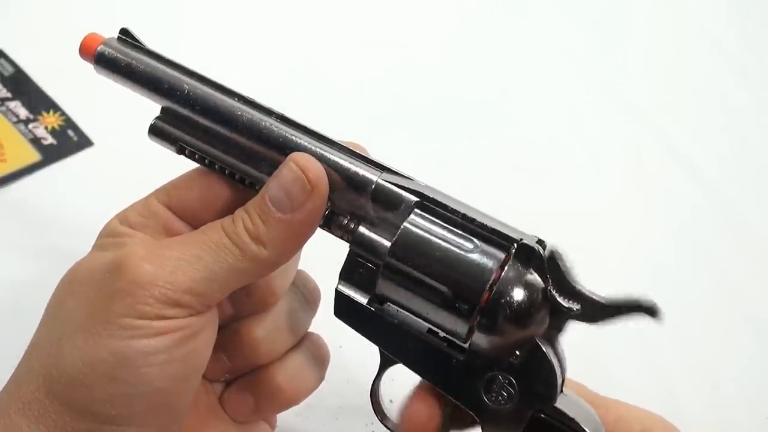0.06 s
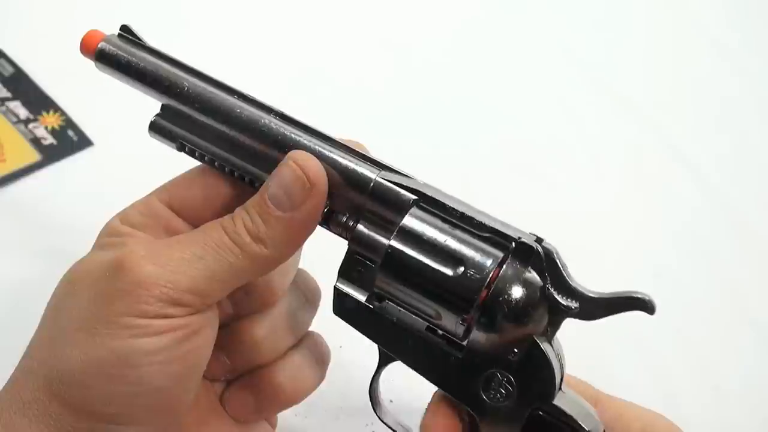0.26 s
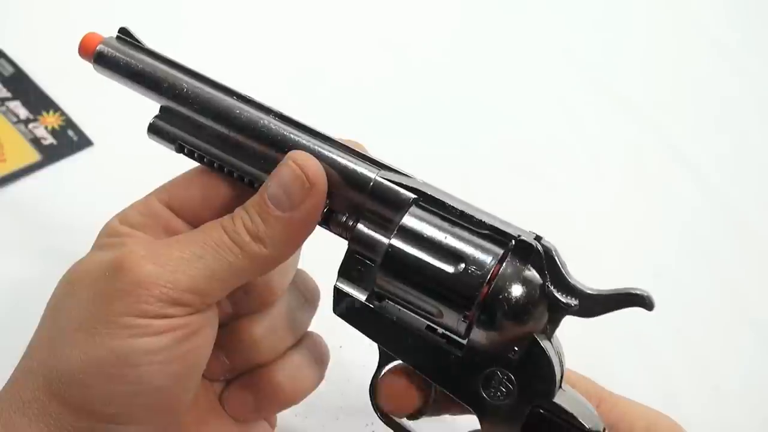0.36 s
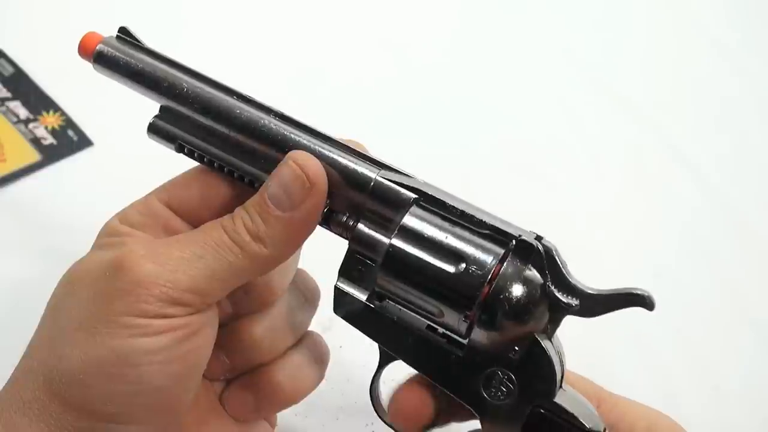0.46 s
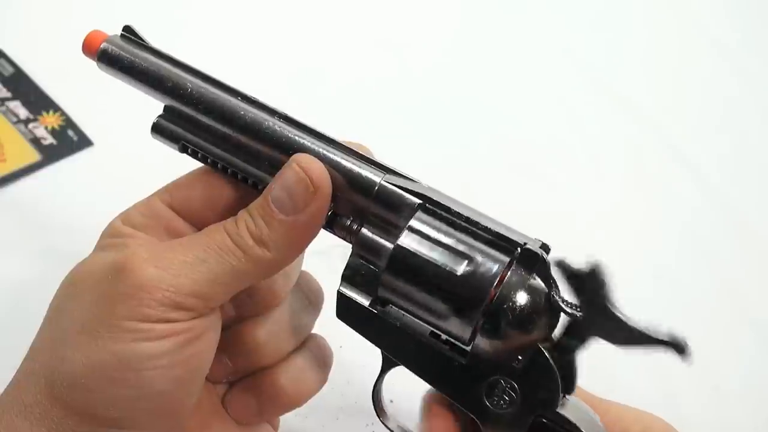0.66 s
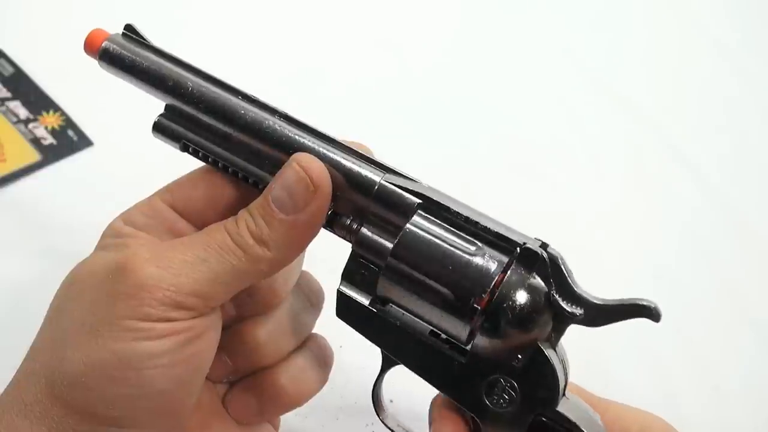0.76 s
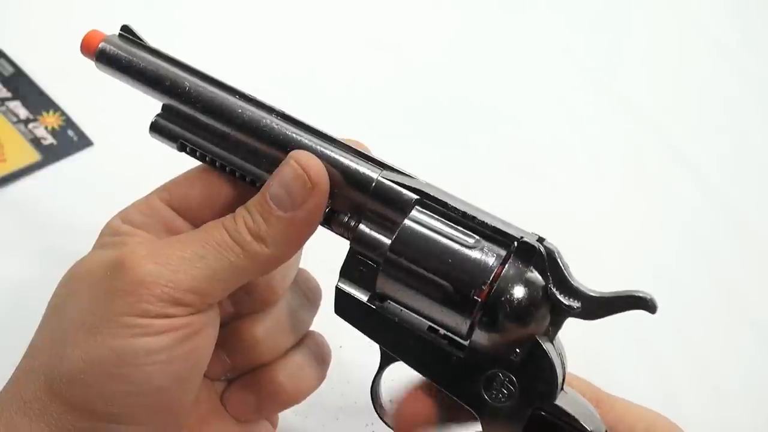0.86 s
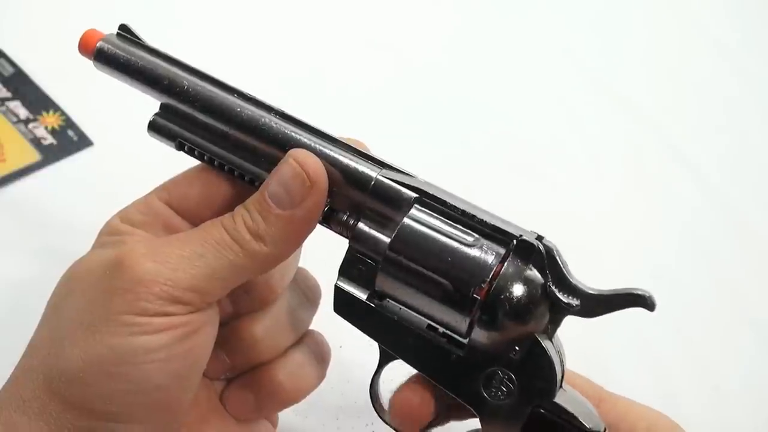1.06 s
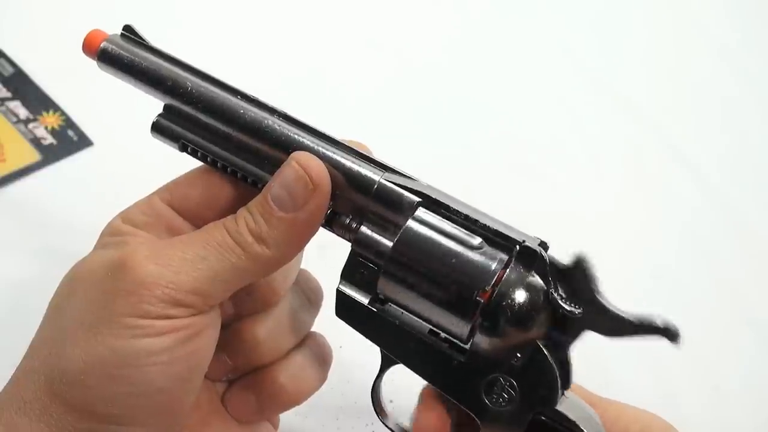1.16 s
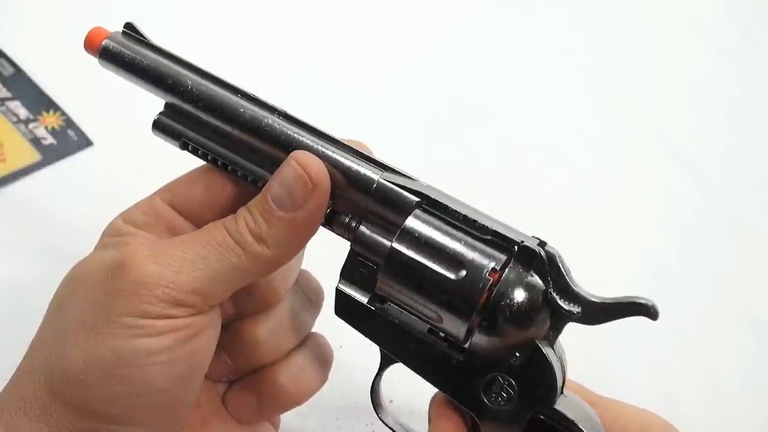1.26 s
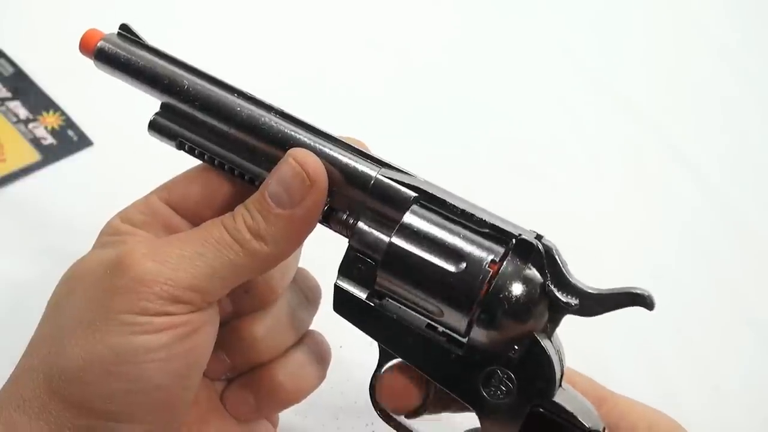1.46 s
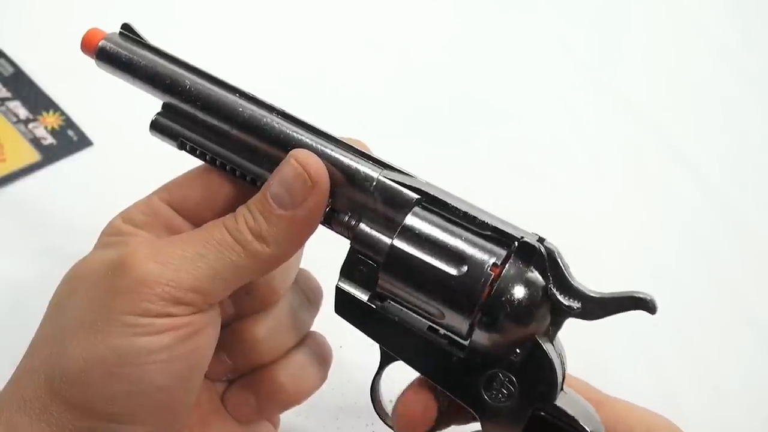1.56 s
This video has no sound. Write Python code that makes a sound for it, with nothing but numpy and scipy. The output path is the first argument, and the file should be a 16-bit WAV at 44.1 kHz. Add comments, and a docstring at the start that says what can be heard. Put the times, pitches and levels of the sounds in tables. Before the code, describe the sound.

Three sharp cracks from a toy cap revolver come at an even pace, close up indoors. Each dies away quickly and is followed by a bright trigger click, with light metal ticking as the cylinder turns.

```python
"""Small room: a toy metal revolver fires three caps close by, over faint air noise.
Each pull scrapes and ticks the cylinder round, the hammer swings, the cap cracks
and a short, dense, squashed-sounding blare follows, dying away with the room.
The trigger snaps back with a bright click; the metal frame rings on faintly."""
import sys
import numpy as np
from scipy import signal
from scipy.fft import rfft, irfft
from scipy.io import wavfile

SR = 44100
rng = np.random.default_rng(int(sys.argv[2]) if len(sys.argv) > 2 else 0)


def generate_wav(sig):
    """Save sig (samples, or channels by samples) to the path in sys.argv[1] as 16-bit PCM at SR."""
    pcm = np.round(np.clip(np.atleast_2d(sig).T, -1, 1) * 32767).astype(np.int16)
    wavfile.write(sys.argv[1], SR, pcm)


N = 70560
T = np.arange(N) / SR
FREQS_HZ = np.maximum(np.fft.rfftfreq(N, 1 / SR), 1)

# cylinder scrapes: t/s, length/s, level/dB
SCRAPES = [(0.049, 0.042, -59), (0.678, 0.049, -57), (1.101, 0.054, -67.5)]
# pawl and cylinder ticks: t/s, level/dB
RATCHET_TICKS = [(0.0650, -48.5), (0.0790, -46.5), (0.139, -48), (0.1465, -44.5), (0.1550, -51),
                 (0.1650, -53.5), (0.1740, -53.5), (0.3530, -43), (0.542, -51.5), (0.697, -44.5),
                 (0.705, -50.5), (0.7140, -45), (0.7314, -44.5), (0.908, -47.5), (1.1404, -45),
                 (1.1978, -49), (1.2100, -45), (1.2170, -53.5), (1.2310, -55), (1.2450, -42.5),
                 (1.407, -49), (1.5560, -56.5), (1.5880, -49.5)]
# hammer swings: t/s, length/s, level/dB
HAMMER_SWINGS = [(0.1964, 0.02, -30.5), (0.738, 0.0057, -41), (1.252, 0.0126, -34.5)]
# caps: t/s, crack/dB, snap/dB, blare/dB, thump/dB, blare hold/s, tilt/(dB/octave)
CAP_SHOTS = [(0.2066, -14.5, -5.5, -17.5, -34.5, 0.048, 0), (0.7487, -19, -15, -19, -51.5, 0.037, 1.24),
             (1.2646, -16.5, -7.5, -17.5, -41, 0.04, 0.5)]
# trigger returns: t/s, click/dB, ring/dB, room/dB
TRIGGER_RETURNS = [(0.3960, -22.5, -36.5, -37.5), (0.9484, -25.5, -26, -38.5), (1.4384, -23, -30.5, -37.5)]
# noise spectra: f/Hz, relative density/dB
AIR_SPECTRUM = [(25, -21), (60, -15), (130, -10), (200, -12), (270, -5), (380, -16), (700, -19),
                (1500, -24), (3200, -28), (5200, -38), (9000, -48), (16000, -42)]
CYLINDER_SPECTRUM = [(500, -24.5), (900, -6.5), (1700, -7), (2300, 1.5), (3000, -0.5), (4100, -7.5),
                     (6800, -17.5), (10000, -31), (14500, -30.5), (16000, -41)]
HAMMER_SPECTRUM = [(180, -46), (300, -11), (1430, -5), (2100, -10.5), (4990, -13), (8360, -40),
                   (15000, -34.5), (16000, -50)]
CRACK_SPECTRUM = [(59, -35), (100, -4.5), (705, -13), (1420, 3.5), (1720, -6.5), (1950, 3), (2220, -5.5),
                  (3700, -11), (4290, -13), (6700, -16), (7290, -23.5), (12700, -14), (16000, -15)]
ECHO_SPECTRUM = [(60, -46), (130, -29), (180, -23), (280, -13.5), (380, -13), (500, -10.5), (680, -11),
                 (900, -7.5), (1300, -4.5), (1900, 0), (2400, -5.5), (3500, -9), (5300, -15.5), (6700, -13),
                 (9300, -22), (12500, -15), (15500, -20.5)]
CLICK_SPECTRUM = [(300, -30), (800, -7.5), (1100, -15), (2400, -7), (2900, -2.5), (3600, -1.5),
                  (6500, -8.5), (9400, -19), (12000, -18), (15000, -10), (16000, -17)]
# frame modes: f/Hz, level/dB, t60/s
FRAME_RING = [(1125, -2, 2.2), (1579, -6, 1.4), (1610, -3, 1.5), (2084, -3, 2.0), (2487, -5, 1.8),
              (2649, -6, 1.0), (3268, -6, 1.6), (3833, -12, 1.4)]
# trigger and spring modes: f/Hz, level/dB, t60/s
TRIGGER_RING = [(2780, 1.5, 0.041), (2914, -3, 0.016), (3155, -4, 0.041), (3503, -14.5, 0.088),
                (5000, -11.5, 0.021), (6560, -10, 0.033), (4600, -33, 0.3), (3620, -43, 0.42)]
# room and table-top modes: f/Hz, level/dB
ROOM_RING = [(178, -14), (262, -12), (292, -6), (571, -6), (789, -3.5), (1011, -7.5), (1128, -0.5),
             (1309, -8), (1402, 6), (1496, -4.5), (1542, 0.5), (1830, -1), (1906, -1), (1973, -3.5)]
# room decay: f/Hz, t60/s
ROOM_DECAY = [(100, 0.32), (280, 0.26), (700, 0.21), (1600, 0.16), (3500, 0.18), (7000, 0.18),
              (15000, 0.13)]
# stereo width: f/Hz, side minus mid/dB
STEREO_WIDTH = [(100, -9), (1000, -15.5), (3000, -12.5), (4600, -19), (5500, 1.5), (7000, 2), (10000, 3.5),
                (11500, -7.5), (15000, -18)]
# stereo balance: f/Hz, left minus right/dB
BALANCE = [(100, 4), (270, 6.5), (650, 1.8), (1400, 3.6), (2800, 1.4), (5000, .5), (8000, 1.8), (15000, .9)]

TOP_HZ = 16000
CLICK_T60_S, ROOM_RISE_S = 0.022, 0.0058


def undb(db):
    """Decibels to gain."""
    return 10 ** (np.asarray(db) / 20)


def lookup(table, hz=FREQS_HZ):
    """Interpolate over log frequency."""
    points_hz, values = np.array(table, float).T
    return np.interp(np.log(hz), np.log(points_hz), values)


def ramp(start_s, length_s):
    """Linear rise from 0 to 1, then held."""
    return np.clip((T - start_s) / length_s, 0, 1)


def fade(start_s, t60_s):
    """Unity until the start, then exponential decay."""
    return np.exp(-np.log(1000) * np.maximum(T - start_s, 0) / t60_s)


def hit(start_s, t60_s, hold_s=0):
    """Instant attack, hold, decay."""
    return (T >= start_s) * fade(start_s + hold_s, t60_s)


def pan(hz):
    """Left and right gains at the gun's position."""
    return undb(np.array([[1], [-1]]) * lookup(BALANCE, hz) / 2)


def noise(spectrum):
    """Coloured stereo noise; mid rms 1 before panning."""
    gain = undb(lookup(spectrum)) / (1 + (FREQS_HZ / TOP_HZ) ** 40)
    mid, side = rfft(rng.standard_normal((2, N))) * gain / np.sqrt(np.mean(gain ** 2))
    return irfft(mid * pan(FREQS_HZ) + np.array([side, -side]) * undb(lookup(STEREO_WIDTH)), N)


def tone(hz):
    """Panned sine, random phase."""
    return np.sqrt(2) * np.sin(2 * np.pi * (hz * T + rng.random())) * pan(hz)


def ring(modes, start_s):
    """Struck metal: decaying modes."""
    return sum(undb(db) * tone(hz) * hit(start_s, t60_s) for hz, db, t60_s in modes)


def highpass(x, hz):
    """Second-order Butterworth."""
    return signal.sosfilt(signal.butter(2, hz, "high", fs=SR, output="sos"), x)


def tilt(x, db_per_octave, pivot_hz=2000):
    """Spectral slope about the pivot."""
    return irfft(rfft(x) * undb(db_per_octave * np.log2(FREQS_HZ / pivot_hz)), N)


def room_fade(x, start_s):
    """Each band decays at the room's rate from the start on."""
    spectrum, out = rfft(x), 0
    log_centres = np.log([hz for hz, _ in ROOM_DECAY])
    for pick, (_, t60_s) in zip(np.eye(len(log_centres)), ROOM_DECAY):
        band = irfft(spectrum * np.interp(np.log(FREQS_HZ), log_centres, pick), N)
        out = out + band * fade(start_s, t60_s)
    return out


def air(level_db=-68):
    """Steady room air."""
    return undb(level_db) * noise(AIR_SPECTRUM)


def frame(gain_db=-65, split_hz=4.3, twin_db=-5.5, prior_shot_s=-0.31):
    """Each shot restarts the frame's beating mode pairs; a shot before t = 0 still rings."""
    twins = [(hz + split_hz, db + twin_db, t60_s) for hz, db, t60_s in FRAME_RING]
    modes = list(FRAME_RING) + twins
    starts_s = [prior_shot_s] + [shot[0] for shot in CAP_SHOTS]
    spans = zip(starts_s, starts_s[1:] + [np.inf])
    return undb(gain_db) * sum(ring(modes, start_s) * (T < end_s) for start_s, end_s in spans)


def cylinder():
    """The cylinder rubs round, swelling and fading."""
    envelope = sum(undb(db) * np.sin(np.pi * ramp(start_s, length_s))
                   for start_s, length_s, db in SCRAPES)
    return noise(CYLINDER_SPECTRUM) * envelope


def ratchet(rise_s=0.00074, t60_s=0.031, room_db=-12):
    """Pawl and cylinder tick, each tick with a faint room tail."""
    room_t60_s, power = lookup(ROOM_DECAY, hz=3000), 0
    for start_s, db in RATCHET_TICKS:
        decay = np.hypot(hit(start_s, t60_s), undb(room_db) * hit(start_s, room_t60_s))
        power = power + (undb(db) * ramp(start_s, rise_s) * decay) ** 2
    return noise(CYLINDER_SPECTRUM) * np.sqrt(power)


def hammer():
    """The hammer scrapes down, louder as it gathers speed."""
    envelope = sum(undb(db) * np.sqrt(ramp(start_s, length_s)) * hit(start_s, CLICK_T60_S, length_s)
                   for start_s, length_s, db in HAMMER_SWINGS)
    return noise(HAMMER_SPECTRUM) * envelope


def cap_crack(start_s, flash_s=0.0016, flash_db=-5.5):
    """The cap catches just before the snap, then bursts."""
    flash = undb(flash_db) * ((T > start_s - flash_s) & (T < start_s))
    burst = hit(start_s, t60_s=0.015, hold_s=0.009)
    return highpass(noise(CRACK_SPECTRUM) * (flash + burst), hz=107)


def cap_snap(start_s, pulse_s=0.0006, chamber_hz=1318, chamber_db=-11):
    """An N-shaped pressure pulse rings the chamber; the tiny cap radiates little bass."""
    age_s = T - start_s
    pulse = (1 - 2 * age_s / pulse_s) * ((age_s >= 0) & (age_s < pulse_s)) * pan(1 / pulse_s)
    chamber = np.sin(2 * np.pi * chamber_hz * age_s) * hit(start_s, t60_s=0.008) * pan(chamber_hz)
    return highpass(pulse + undb(chamber_db) * chamber, hz=700)


def gas_thump(start_s, hz=99, rise_s=0.0078, t60_s=0.056):
    """The puff of gas: a low damped sine."""
    envelope = ramp(start_s, rise_s) * fade(start_s + rise_s, t60_s)
    return np.sqrt(2) * np.sin(2 * np.pi * hz * (T - start_s)) * envelope * pan(hz)


def shot_blare(start_s, hold_s, common_echoes, common_share=0.74, swell_db=6, modes_db=-3):
    """The shot's blare, shaped to sound squashed: it swells, stays level, then dies with the room."""
    swell = undb(swell_db * (ramp(start_s, 0.8 * hold_s) - 1))
    release_s = start_s + hold_s
    echoes = np.sqrt(common_share) * common_echoes + np.sqrt(1 - common_share) * noise(ECHO_SPECTRUM)
    modes = sum(undb(db) * tone(hz) * fade(release_s, lookup(ROOM_DECAY, hz)) for hz, db in ROOM_RING)
    blare = room_fade(echoes, release_s) + undb(modes_db) * modes / np.sqrt(len(ROOM_RING))
    return ramp(start_s, ROOM_RISE_S) * swell * blare


def shots():
    """Each cap cracks, snaps, thumps and blares."""
    out, common_echoes = 0, noise(ECHO_SPECTRUM)
    for start_s, crack_db, snap_db, blare_db, thump_db, hold_s, db_per_octave in CAP_SHOTS:
        crack = undb(crack_db) * cap_crack(start_s)
        snap = undb(snap_db) * cap_snap(start_s)
        thump = undb(thump_db) * gas_thump(start_s)
        blare = undb(blare_db) * shot_blare(start_s, hold_s, common_echoes)
        out = out + snap + thump + tilt(crack + blare, db_per_octave)
    return out


def trigger(slide_s=0.0069, slide_db=-16.5, bounce_s=0.0076, bounce_db=-9):
    """The released trigger slides, hits its stop, bounces and rings."""
    out = 0
    for start_s, click_db, ring_db, room_db in TRIGGER_RETURNS:
        slide = undb(slide_db) * np.sqrt(ramp(start_s - slide_s, slide_s)) * (T < start_s)
        blows = hit(start_s, CLICK_T60_S) + undb(bounce_db) * hit(start_s + bounce_s, CLICK_T60_S)
        echoes = tilt(noise(CLICK_SPECTRUM), db_per_octave=-1)
        room = undb(room_db) * room_fade(echoes, start_s) * ramp(start_s, ROOM_RISE_S)
        click = undb(click_db) * noise(CLICK_SPECTRUM) * (slide + blows)
        out = out + click + undb(ring_db) * ring(TRIGGER_RING, start_s) + room
    return out


def scene():
    """Revolver over room air; its small parts radiate little bass."""
    firing = shots() + frame() + hammer()
    small_parts = highpass(trigger() + ratchet() + cylinder(), hz=970)
    return firing + small_parts + air()


def record(dry):
    """Soft-clip the peaks, cut the top."""
    ceiling = 1.2
    lowpass = signal.ellip(10, 0.2, 80, TOP_HZ, fs=SR, output="sos")
    return signal.sosfilt(lowpass, ceiling * np.tanh(dry / ceiling))


dry = scene()
out = record(dry)
generate_wav(out)
```